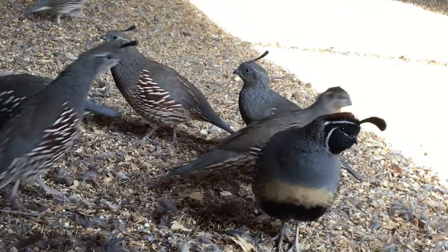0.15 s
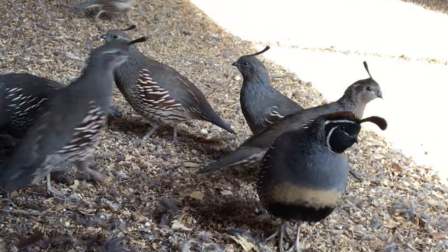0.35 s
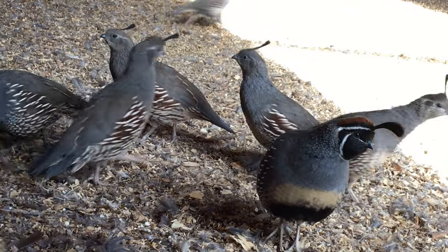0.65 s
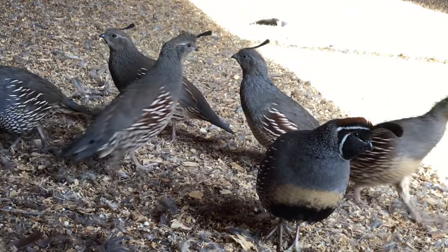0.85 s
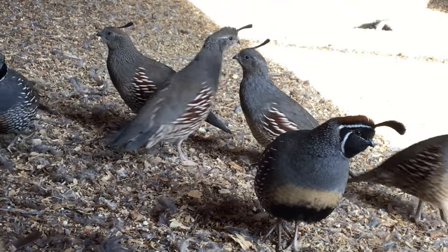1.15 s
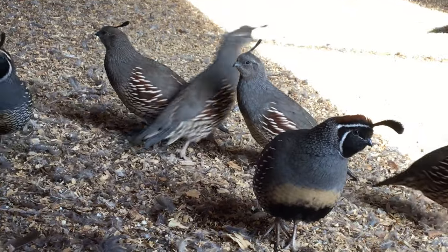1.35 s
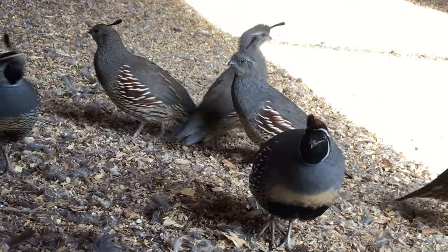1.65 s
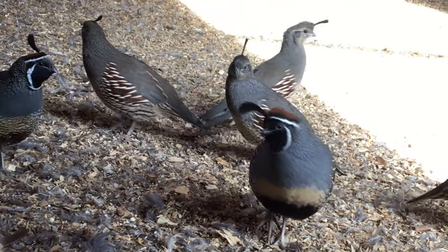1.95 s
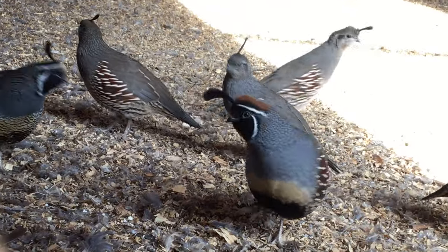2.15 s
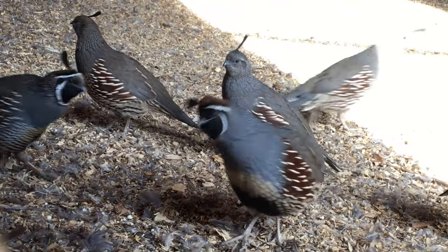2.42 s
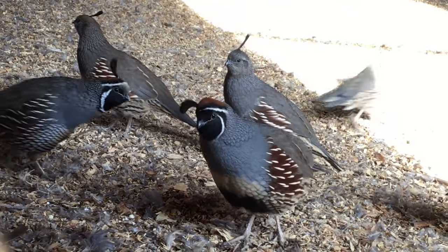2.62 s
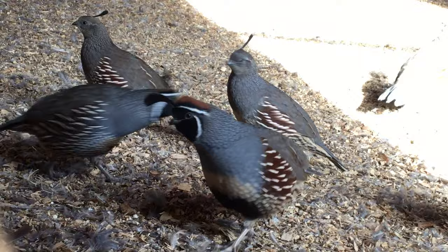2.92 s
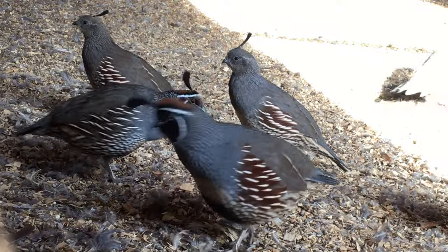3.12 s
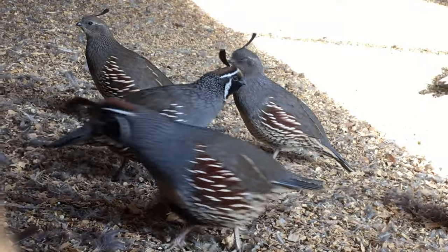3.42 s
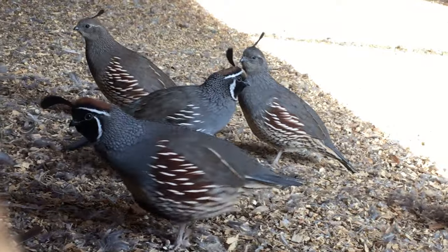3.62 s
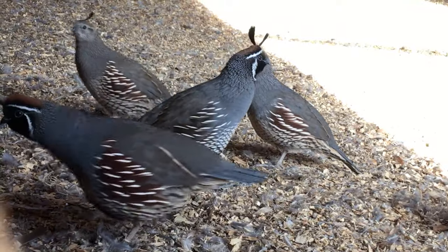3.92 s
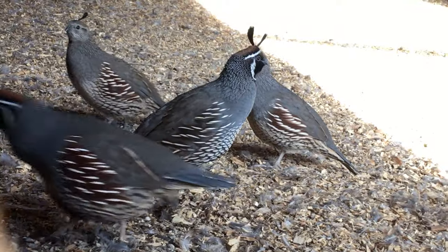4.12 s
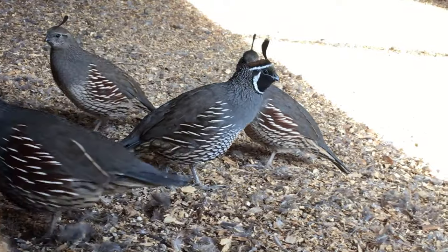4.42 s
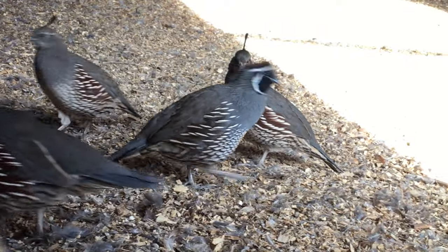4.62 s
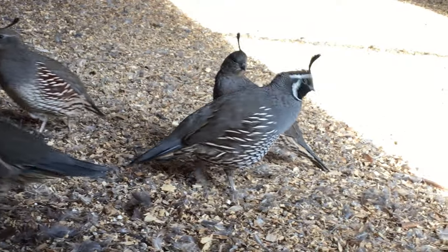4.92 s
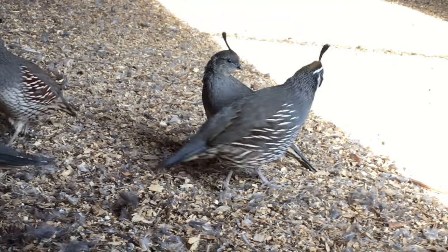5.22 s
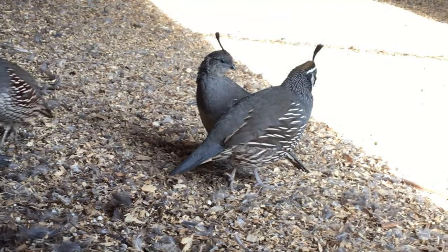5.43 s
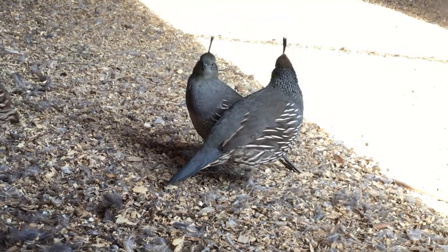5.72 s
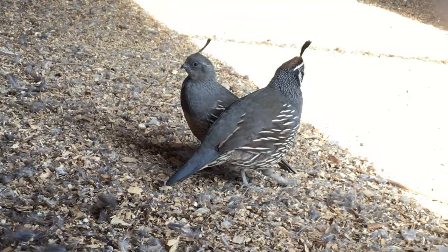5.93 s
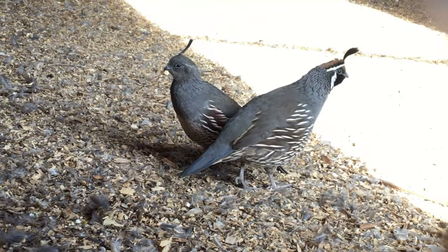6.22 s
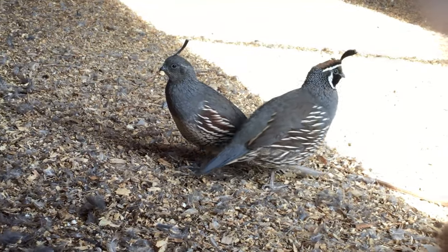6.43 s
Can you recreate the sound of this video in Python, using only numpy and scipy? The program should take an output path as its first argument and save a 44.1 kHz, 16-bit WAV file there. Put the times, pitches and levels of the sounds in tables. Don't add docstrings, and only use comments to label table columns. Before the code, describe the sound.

Close outdoor pickup of a small quail flock. Brittle ticks and scuffs of feet in husks run throughout, with a soft dull bump early on. A bird crows in a string of quick, sliding, reedy notes while others murmur behind; then come five evenly spaced, throaty clucks with a rough, fluttering edge. Walls add brief reverberation above air hiss and distant rumbling traffic.

```python
import sys
import numpy as np
from scipy import signal
from scipy.fft import rfft, irfft, next_fast_len
from scipy.io import wavfile
from scipy.ndimage import uniform_filter1d

SR = 44100
rng = np.random.default_rng(int(sys.argv[2]) if len(sys.argv) > 2 else 0)


def undo_db(level):
    steps = np.asarray(level, float) / 20
    return 10 ** steps


def int16_out(signal):
    q = np.round(np.clip(np.atleast_2d(signal).T, -1, 1) * 32767)
    wavfile.write(sys.argv[1], SR, q.astype(np.int16))


N = 289719


def rms_one(x):
    return x / np.sqrt(np.mean(x ** 2) + 1e-20)


def at_hz(points, hz):
    return np.interp(np.log(hz), np.log(np.array(points)[:, 0]), np.array(points)[:, 1])


def wander(n, rate_hz):
    r = np.exp(-2 * np.pi * rate_hz / SR)
    return rms_one(signal.lfilter([1], [1, -2 * r, r * r], rng.standard_normal(n + 4000))[4000:])


def coloured(n, spectrum, pulses=0):
    size = next_fast_len(n)
    hz = np.maximum(np.fft.rfftfreq(size, 1 / SR), 1)
    source = rfft(rng.standard_normal(n) + pulses, size)
    return rms_one(irfft(source * undo_db(at_hz(spectrum, hz)), size)[:n])


def placed(shape, start_s, length_s, hz, level_db, *rest):
    return [(start_s + share * length_s, ratio * hz, level_db + db, *more, *rest)
            for share, ratio, db, *more in shape]


def note(rows, edge_s):
    s, *columns = np.transpose(rows)
    t = np.arange(round(s[0] * SR), round(s[-1] * SR)) / SR
    edges = np.clip(np.minimum(t - s[0], s[-1] - t) / edge_s, 0, 1)
    return round(s[0] * SR), [np.interp(t, s, c) for c in columns], edges


# (frequency [Hz], level over the mean of the two lowest [dB])
CROW_THROAT = [(2100, -3), (2600, -19), (3500, -23), (4500, -30.5), (6000, -40), (12000, -45)]
# (frequency [Hz], level [dB])
WINDPIPE = [(3000, -87), (4800, -27), (5500, -13), (6000, -2), (6800, -17.5), (8000, -41), (12000, -46)]


def glides(notes, beaks_db, shuts_db, throat, wobble, shimmer_db, tunes_db=np.zeros(9), pipes=np.ones(9)):
    out = np.zeros(N)
    for rows, beak_db, shut_db, tune_db, pipe in zip(notes, beaks_db, shuts_db, tunes_db, pipes):
        at, (hz, *controls), edges = note(rows, edge_s=0.0028)
        n = len(hz)
        t = np.arange(n) / SR
        first_db, second_db, third_db, ring_db = throat(hz, *controls)
        third_db = third_db + shut_db * np.exp(-t / 0.1)
        hz = uniform_filter1d(hz, size=300, mode="nearest") * (1 + wobble * wander(n, 67))
        phase = 2 * np.pi * np.cumsum(hz) / SR

        sizes = [undo_db(first_db), undo_db(second_db + tune_db), undo_db(third_db)]
        upper_db = (first_db + second_db) / 2 + beak_db + 0.28 * (ring_db + 47)
        late = undo_db(-8 * np.exp(-t / 0.022))
        for k in range(4, 15):
            through_throat = undo_db(upper_db + at_hz(CROW_THROAT, k * hz))
            through_windpipe = undo_db(ring_db + at_hz(WINDPIPE, k * hz / pipe))
            sizes.append((through_throat + through_windpipe) * late)

        for k, size in enumerate(sizes, 1):
            depth_db = shimmer_db * (0.68 + 0.29 * min(k, 6.5) + 0.47 * (k > 3))
            shimmer = undo_db(depth_db * np.clip(wander(n, 42.4), -2.5, 1.2))
            partial = np.sqrt(2) * np.sin(k * phase + rng.uniform(0, 2 * np.pi))
            out[at:at + n] += edges * size * shimmer * partial
    return out


# (frequency [Hz], level [dB])
THROAT_FIRST = [(430, -45), (550, -46), (620, -42.5), (740, -40.5), (850, -35), (960, -24)]
THROAT_SECOND = [(860, -69), (1080, -51.5), (1400, -37), (1520, -28.5), (1665, -20.5), (1710, -20.5),
                 (1752, -32), (1790, -22.5), (1850, -27), (1930, -24.5)]
THROAT_THIRD = [(1300, -81), (1650, -51), (1800, -40.5), (1920, -45), (2130, -40), (2250, -46),
                (2500, -48.5), (2900, -47.5)]
# (pitch [Hz], windpipe drive [dB])
WINDPIPE_DRIVE = [(550, -81), (650, -67), (740, -53), (850, -44.5), (960, -43)]


def crower_throat(hz, effort_db, windpipe_db):
    parts = enumerate([THROAT_FIRST, THROAT_SECOND, THROAT_THIRD], 1)
    levels = [at_hz(part, k * hz) for k, part in parts]
    levels.append(windpipe_db + at_hz(WINDPIPE_DRIVE, hz))
    return [effort_db + db for db in levels]


# (share of length [0-1], share of top pitch [0-1], effort [dB])
CHIP = [(0, .74, -6), (.15, .88, 3), (.35, 0.98, 2), (.55, 0.99, 1.5), (.78, .94, 2.5), (1, 0.68, 3.5)]
RISE = [(0, .459, -0.27), (.075, .625, -0.33), (.15, .79, -0.3), (.34, .836, 0.25), (.575, .925, 1),
        (.81, 1, 0), (.905, 0.99, -0.74), (1, .62, -1.2)]
TAIL = [(0, .88, -0.5), (.25, 0.94, 2), (.4, 1, 1), (.58, 0.98, 3), (.81, .96, 2.5), (.92, .86, -2.5),
        (1, 0.77, -1)]
# (start [s], length [s], top pitch [Hz], effort [dB], windpipe [dB])
CHIPS = [
    (1.715, 0.075, 801.4, -3, -9),
    (2.557, 0.067, 704.6, -1, -31),
    (3.981, 0.074, 781, -0.5, 7.5),
]
RISES = [
    (3.021, .227, 932.7, 0.47, 1.4),
    (4.2, .242, 965, 0.012, 3.5),
]
TAILS = [
    (2.276, 0.11, 743, -0.35, -6),
    (3.476, 0.13, 756.6, 0.052, -2),
    (4.664, .082, 729.5, -1.2, -2),
]
# (time [s], pitch [Hz], effort [dB])
HEADS = [
    [(1.94, 558, -9), (1.97, 722.6, -1.5), (2.0, 778.4, -1), (2.1, 874, -0.5), (2.13, 862.6, 0),
     (2.145, 800.6, 0), (2.17, 811, -1), (2.2, 754, 2), (2.235, 660, 1.5)],
    [(3.325, 528, -2), (3.34, 739, 2.5), (3.355, 841, 1.5), (3.375, 876, -0.5), (3.4, 878.5, 2.5),
     (3.415, 813, 1.5), (3.435, 687, 0.5), (3.458, 627, 3)],
    [(4.52, 548, 0), (4.535, 750, 1), (4.55, 846, 1), (4.575, 909, 0), (4.6, 866, -1.5), (4.63, 716, 2.5),
     (4.655, 681, -0.5)],
]
HEAD_WINDPIPE_DB = [-0.5, 3.5, -0.5]
# (time [s], pitch [Hz], effort [dB])
LONE = [(2.786, 600, -6), (2.798, 686, -2), (2.81, 721, 5.5), (2.83, 768, 1.5), (2.851, 733, 1.5),
        (2.869, 570, 6)]
# partials above the third, by beak opening [dB]
BEAK_DB = [3, 15, -2.5, -7, -10, -5, -4, -2, -4]
SHUT_DB = [5, -9, 1, -14, -12.5, -13, 1.5, 0, 0.5]
TUNED_DB = [0.24, -1.7, 1.4, -0.15, -0.55, -0.66, -0.26, 0.42, 0.19]
PIPE_SHIFT = [1.16, 1.0, 1.08, 1.0, 0.99, 1.01, 0.99, 0.99, 1.0]


def crowing_bird():
    notes = [placed(CHIP, *row) for row in CHIPS]
    notes += [placed(RISE, *row) for row in RISES]
    for head, ring_db, tail in zip(HEADS, HEAD_WINDPIPE_DB, TAILS):
        notes.append([(*p, ring_db) for p in head] + placed(TAIL, *tail))
    notes.append([(*p, 3.5) for p in LONE])
    return glides(notes, BEAK_DB, SHUT_DB, crower_throat, wobble=0.0026, shimmer_db=1.57,
                  tunes_db=TUNED_DB, pipes=PIPE_SHIFT)


# (start [s], length [s], pitch [Hz], level [dB], beak ring near 3.4 kHz [dB])
CLUCKS = [
    (5.188, .14, 717, -31, -6.5),
    (5.457, 0.096, 728, -29, -10),
    (5.694, 0.088, 724, -29.5, -8.5),
    (5.959, 0.0904, 679.3, -31, -2.5),
    (6.284, 0.089, 664.6, -32.5, 12.5),
]
# (share of length [0-1], share of pitch, level [dB], rasp [0-1])
CLUCK = [(0, 1.0, -4, 0.2), (.08, 1.0, -2, 0.56), (.16, 1.005, -1.5, 0.18), (.3, 1.0, 1, 0.1),
         (.44, .988, 0.5, 0.13), (.49, 1.032, -.5, .36), (.57, 1.01, -1.5, 0.45), (.66, 1.0, 0.5, .85),
         (.85, .99, -6, 0.96), (1, 0.99, -16.5, 1)]
# (frequency [Hz], level [dB])
CLUCK_THROAT = [(350, -41), (600, -8.5), (1500, 5.5), (2950, -11.5), (3510, -16.5), (4460, -17.5),
                (5730, -30), (6490, -20.5), (8990, -38), (10500, -35), (12000, -37), (15600, -71),
                (22000, -120)]
# (frequency [Hz], density [dB per Hz])
RASP = [(450, -54), (755, -0.5), (1150, -10), (1500, -6.5), (1820, 4), (2200, -5.5), (3000, -6.5),
        (4200, -16), (5550, -23), (6770, -24), (12000, -38), (22000, -90)]
CLUCK_BREAKS = [1, 0.91, 0.94, 0.8, 0.77]
HOARSE = [0, .03, .03, .12, .2]
# half partials, as every other cycle weakens [dB]
HALF_DB = [-5.5, -4, -4, -6, -7]
CLUCK_FIRSTS_DB = [0.5, -0.5, 0.5, -0.5, 5]
CLUCK_THIRDS_DB = [1.1, 6.2, 5.7, 2.3, 1.3]


def clucking_bird():
    out = np.zeros(N)
    per_cluck = zip(CLUCKS, CLUCK_BREAKS, CLUCK_THIRDS_DB, HALF_DB, HOARSE, CLUCK_FIRSTS_DB)
    for (*row, ring_db), breaks, third_db, half_db, hoarse, first_db in per_cluck:
        at, (hz, level_db, rasp), edges = note(placed(CLUCK, *row), edge_s=0.0016)
        n = len(hz)
        dip_db = 0.11 * (row[2] - 715)
        settle_s = 0.0061 * (row[1] / 0.09) ** 1.6
        tight = np.exp(-(np.arange(n) / SR / settle_s) ** 2)
        hz = hz * (1 + 0.33 * tight)
        rasp = np.clip(rasp * breaks + hoarse, 0, .95) ** 2
        jitter = (.003 + .03 * hoarse + .05 * rasp ** 2) * wander(n, 120)
        phase = 2 * np.pi * np.cumsum(hz * (1 + jitter)) / SR
        slope_db = 0.13 * (level_db - level_db.max())
        throb = 2 * np.pi * np.cumsum(62.0 * undo_db(1.54 * wander(n, 15.1))) / SR

        voiced = 0
        for k in range(1, 16):
            size_db = at_hz(CLUCK_THROAT, k * hz) + slope_db * np.log2(max(k / 2, 1))
            size_db += first_db * (k == 1) + dip_db * (k == 2) + third_db * (k == 3)
            size_db += -10 * tight * (k > 2)
            size_db += ring_db * (np.exp(-((k * hz - 3370) / 260) ** 2) - 0.71 * (k == 4))
            size_db += min(.6 * k + 5 * hoarse, 2.6) * wander(n, 70)
            size_db += 5.5 * min(.2 * (k - 1) ** 2 + 2 * hoarse, 1) * np.sin(throb + 1.7 * k)
            voiced = voiced + undo_db(size_db) * np.sin(k * phase - 0.328 * k * k)

        halves = 0
        for k in range(1, 7):
            size_db = at_hz(RASP, (k + .5) * hz) + 3.0 * wander(n, 60)
            halves = halves + undo_db(size_db) * np.sin((k + .5) * phase + k * k)

        snap_count = np.floor(np.cumsum(500 * undo_db(4 * wander(n, 300))) / SR)
        snaps = np.diff(snap_count, prepend=0) * rng.uniform(-1, 1, n)
        bursts = coloured(n, RASP, rms_one(snaps) * rasp)
        bursts = bursts * undo_db(2.5 * np.clip(wander(n, 61), -2, 1.3))
        broken = rms_one(rms_one(bursts) + undo_db(half_db) * rms_one(halves))
        mix = np.sqrt(1 - rasp) * rms_one(voiced) + np.sqrt(rasp) * broken
        out[at:at + n] += edges * undo_db(level_db) * mix
    return out


# (frequency [Hz], level [dB])
NEIGHBOUR_SECOND = [(850, -17), (1150, -6), (1420, 1), (1660, -8.5), (1760, -0.5)]


def neighbour_throat(hz, level_db, lift_db):
    second_db = level_db + lift_db + at_hz(NEIGHBOUR_SECOND, 2 * hz)
    return level_db, second_db, second_db - 11.0 - 1.2 * lift_db, second_db - 31


# (time [s], pitch [Hz], level [dB])
OVERLAPS = [
    [(2.03, 397.4, -56), (2.1, 424, -46.5), (2.125, 531, -50.5), (2.145, 631, -47), (2.18, 714, -39.5),
     (2.22, 751.4, -43.5), (2.26, 735, -38), (2.295, 604, -52)],
    [(2.74, 424, -42), (2.758, 463, -47), (2.766, 567, -45), (2.78, 687.5, -42.5), (2.805, 802, -36.5),
     (2.85, 838, -33.5), (2.89, 882, -40.5), (2.915, 843, -36), (2.937, 565, -55)],
    [(3.07, 651, -51), (3.12, 482, -48), (3.15, 580, -44.5), (3.175, 537.6, -45), (3.21, 394, -50.5)],
]
# (time [s], pitch [Hz], level [dB])
PRELUDE = [(1.932, 504, -47), (1.95, 606, -41.5), (1.97, 580, -49), (1.995, 424, -48), (2.02, 398, -56)]


def neighbours():
    notes = [[(*p, 0) for p in rows] for rows in OVERLAPS + [PRELUDE]]
    return glides(notes, [7.7, 1.0, 2.5, 9.7], np.zeros(4), neighbour_throat, wobble=0.0078, shimmer_db=2.0)


# (frequency [Hz], level [dB])
WHINE_THROAT = [(650, -42), (980, -43), (1280, -41), (1370, -31.5), (1480, -34), (1940, -43.5), (2200, -46),
                (2900, -52)]


def whiner_throat(hz, effort_db, windpipe_db):
    return [effort_db + at_hz(WHINE_THROAT, k * hz) for k in range(1, 4)] + [windpipe_db]


# (time [s], pitch [Hz], effort [dB], windpipe [dB])
WHINE = [(3.79, 986, -3, -86), (3.812, 951, 1, -64), (3.828, 724, -2.5, -64), (3.84, 700, -2.5, -85),
         (3.865, 654, -2, -95), (3.885, 650, -7, -84)]


def whining_bird():
    return glides([WHINE], [17.0], [0], whiner_throat, wobble=0.012, shimmer_db=2.2)


def far_throat(hz, level_db, second_db, third_db):
    return level_db, level_db + second_db, level_db + third_db, level_db - 30


# (time [s], pitch [Hz], level [dB], second partial over it [dB], third partial over it [dB])
FAR_CALLS = [
    [(.04, 850, -53, -6, -14), (.055, 870, -49, -8, -18), (.072, 852, -53, 5, -16),
     (.09, 900, -47, -7, -22), (.105, 946, -66, 11, -8), (.122, 880, -70, 12, -5)],
    [(.114, 735, -66, 12, -10), (.124, 735, -62, 15, -10), (.14, 672, -63, 12.5, 12),
     (.16, 663, -68.5, 10, 17), (.178, 630, -67, 10, 17), (.198, 635, -70, 11, 10)],
    [(.405, 656, -72, 12, -10), (.422, 820, -68, 13, -10), (.432, 935, -69, 15, -12),
     (.448, 953, -65, 22, -8), (.468, 881, -69, 15, -8), (.485, 958, -72, 13, -9),
     (.505, 964, -74, 11, -10)],
]


def far_birds():
    return glides(FAR_CALLS, np.full(3, 4.0), np.zeros(3), far_throat, wobble=0.022, shimmer_db=3.0)


# (start [s], length [s], level [dB])
FAR_RASPS = [
    (0.044, 0.061, -47),
    (0.116, 0.066, -57),
    (0.427, 0.072, -55.5),
]


def far_rasps():
    out = np.zeros(N)
    for s, length, level_db in FAR_RASPS:
        n = round(length * SR)
        swell = undo_db(level_db + 3.0 * wander(n, 70)) * np.sqrt(np.hanning(n))
        out[round(s * SR):][:n] += swell * coloured(n, RASP)
    return out


# (start [s], length [s], frequency [Hz], rms level [dB])
PEEPS = [(.555, .07, 3110, -77), (.66, .12, 1920, -57), (.482, .125, 5080, -70), (.478, .06, 5650, -72),
         (.478, .045, 6650, -72), (2.135, .065, 5020, -62), (.45, .04, 3370, -71), (.16, .04, 4980, -71),
         (1.16, .07, 5050, -72), (1.275, .05, 3180, -67), (1.345, .03, 3150, -69), (1.5, .07, 5050, -73),
         (1.695, .016, 3150, -58)]


def peeps():
    out = np.zeros(N)
    for s, length, hz, level_db in PEEPS:
        n = round(length * SR)
        along = np.arange(n) / n
        drift = .007 * wander(n, 90) + .012 * np.linspace(.5, -.5, n)
        phase = 2 * np.pi * np.cumsum(hz * (1 + drift)) / SR
        level = undo_db(level_db + 4 * wander(n, 70) - 10 * along)
        edges = np.minimum(np.minimum(along, 1 - along) / .1, 1)
        out[round(s * SR):][:n] += level * edges * np.sin(phase) * 2.4
    return out


# (time [s], peak level [dB], centre frequency [Hz])
TICKS = [(0.056, -41, 4400), (0.201, -36, 4840), (.226, -38.5, 8130), (0.271, -38, 6060),
         (1.056, -43, 6050), (1.245, -43.5, 5400), (1.309, -43, 4720), (1.586, -39, 6740),
         (1.618, -35, 6540), (1.642, -37, 5140), (1.84, -39.5, 5100), (2.339, -37, 6000),
         (2.655, -38, 5280), (3.813, -38, 4970), (4.106, -37.5, 5620), (4.655, -40, 4620),
         (4.704, -36, 5000), (4.75, -42, 7000), (4.975, -37, 8600), (5.174, -34, 6800), (5.6406, -43, 9100),
         (5.722, -42, 11000), (5.781, -33, 8000), (5.94, -41, 6460), (.636, -56, 4200), (.654, -53, 3500),
         (6.262, -46, 7000), (6.211, -39.5, 5600), (6.4, -30.5, 5800)]
# (time [s], peak level [dB], centre frequency [Hz])
SCUFFS = [(0.066, -50, 5360), (.475, -46, 6400), (.598, -46, 8000), (6.555, -41, 5940),
          (1.139, -31.5, 5900), (1.426, -34.5, 3920), (2.253, -34.5, 3900), (3.999, -38, 5500),
          (4.005, -35, 8000), (4.488, -39, 10200), (4.744, -42, 4500), (4.823, -42.5, 6314),
          (6.077, -33.5, 6107), (6.251, -40.5, 5810), (6.287, -31, 4740)]
# (time [s], peak level [dB], centre frequency [Hz], length [s])
SNAPS = [(5.8595, -43, 6000, .0008), (5.8625, -40, 8000, .001), (5.8654, -17.5, 9100, .0002),
         (5.8656, -29, 5400, .0008), (5.867, -39, 8100, .002), (3.4395, -31, 6500, .002),
         (2.254, -33, 4200, .002), (5.7215, -27, 9000, .0005), (5.727, -26, 8000, .0007),
         (5.7545, -33, 9500, .0005), (5.784, -28, 6500, .0008), (3.9945, -31, 5500, .001),
         (3.995, -37, 3900, .001)]


def husk_steps():
    out, t = np.zeros(N + SR), np.arange(SR // 12) / SR
    contacts = [(*row, 0.0037) for row in TICKS] + [(*row, 0.01) for row in SCUFFS] + list(SNAPS)
    for s, peak_db, hz, length in contacts:
        cracks_db = 2.5 * np.minimum(rng.exponential(1, len(t)), 4)
        along = t / np.clip(length, .0002, .02)
        crackle = rng.standard_normal(len(t)) * undo_db(cracks_db) * along * np.exp(-along)
        band = [hz / 1.22, min(hz * 1.22, 11500)]
        tick = signal.sosfilt(signal.butter(2, band, "band", fs=SR, output="sos"), crackle)
        crunch = signal.sosfilt(signal.butter(2, [1500, 8500], "band", fs=SR, output="sos"), crackle)
        both = tick + 2.0 * min(length * 250, 1) ** 2 * crunch
        out[round(s * SR):][:len(t)] += undo_db(peak_db - 5.0) * both / np.abs(both).max()
    return out[:N]


# (start [s], length [s], frequency [Hz], rms level [dB])
BUMPS = [
    (.775, 0.11, 125.2, -41),
    (.862, 0.021, 185, -34.5),
]


def bumps():
    out = np.zeros(N)
    for s, length, hz, level_db in BUMPS:
        n = round(length * SR)
        phase = 2 * np.pi * np.cumsum(hz * undo_db(2.2 * wander(n, 60))) / SR
        out[round(s * SR):][:n] += undo_db(level_db + 7.5) * np.sqrt(np.hanning(n)) * np.sin(phase)
    return out


def yard(x):
    t60_s, cut_hz, level_db = 0.24, 6200, -14.5
    t = np.arange(SR // 2) / SR
    tail = rng.standard_normal(len(t)) * undo_db(-60 * t / t60_s) * (t > .004)
    tail = signal.sosfilt(signal.butter(1, cut_hz, fs=SR, output="sos"), tail)
    return undo_db(level_db) * signal.fftconvolve(x, tail / np.sqrt(np.sum(tail ** 2)))[:N]


def patchy(x, depth_db):
    size = next_fast_len(N)
    spectrum, hz, out = rfft(x, size), np.fft.rfftfreq(size, 1 / SR), 0
    band = np.floor(2 * np.log2(np.maximum(hz, 250) / 250))
    for k in range(12):
        out = out + irfft(spectrum * (band == k), size)[:N] * undo_db(depth_db * wander(N, 22.0))
    return out


# (frequency [Hz], density [dB per Hz])
AIR = [(15, -44), (25, -11.5), (59, 1.5), (107, 0.5), (205, -7.5), (296, -16), (597, -19.5), (697, -17),
       (1300, -19.5), (1920, -26.5), (2310, -31.5), (3980, -38.5), (11600, -40.5), (12500, -44),
       (16200, -99), (22000, -120)]
# (time [s], level [dB])
TRAFFIC = [(0.0, -45.5), (0.73, -46), (0.88, -36.5), (0.91, -45), (1.53, -41.5), (1.59, -50), (2.1, -37.5),
           (2.51, -44), (2.54, -34), (2.61, -45), (3.11, -41), (4.19, -45.5), (4.23, -35.5), (4.35, -46),
           (5.74, -40.5), (5.82, -44.5), (6.53, -45.5), (6.57, -37)]
# (time [s], level [dB])
BREEZE = [(0, -51), (.5, -53.5), (.9, -52.5), (1.15, -49.5), (2.6, -51), (4.3, -49.5), (5.6, -50.5),
          (6.1, -49), (6.57, -50)]


def air():
    t = np.arange(N) / SR
    traffic_s, rumble_db = np.transpose(TRAFFIC)
    breeze_s, hiss_db = np.transpose(BREEZE)
    bed = coloured(N, AIR)
    low = signal.sosfiltfilt(signal.butter(2, 245, fs=SR, output="sos"), bed)
    falls = rng.random(N) < 400 * undo_db(6.0 * wander(N, 6)) / SR
    grains = falls * rng.standard_normal(N) + 1e-18
    grains = signal.sosfilt(signal.butter(2, [4500, 10500], "band", fs=SR, output="sos"), grains)
    hiss = rms_one(patchy(bed - low, depth_db=1.97)) + undo_db(-21.0) * rms_one(grains)
    lumps_db = 0.5 * wander(N, 3) + 1.8 * wander(N, 10)
    rumble = rms_one(low) * undo_db(np.interp(t, traffic_s, rumble_db) + lumps_db)
    return hiss * undo_db(np.interp(t, breeze_s, hiss_db)) + rumble


def scene():
    near = crowing_bird() + peeps() + husk_steps() + far_rasps()
    near += neighbours() + whining_bird() + far_birds()
    clucks = clucking_bird()
    echoes = yard(near + undo_db(2.5) * clucks)
    return (near + clucks + echoes + air() + bumps())[None]


def low_pass(x):
    return signal.sosfilt(signal.butter(12, 13190, fs=SR, output="sos"), x)


def record(dry):
    cut = signal.ellip(10, 1, 60, 12650, fs=SR, output="sos")
    return low_pass(signal.sosfilt(cut, dry))


dry = scene()
out = record(dry)
int16_out(out)
```